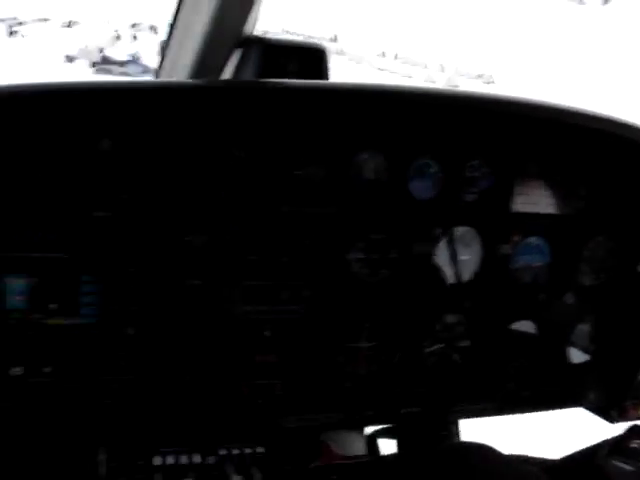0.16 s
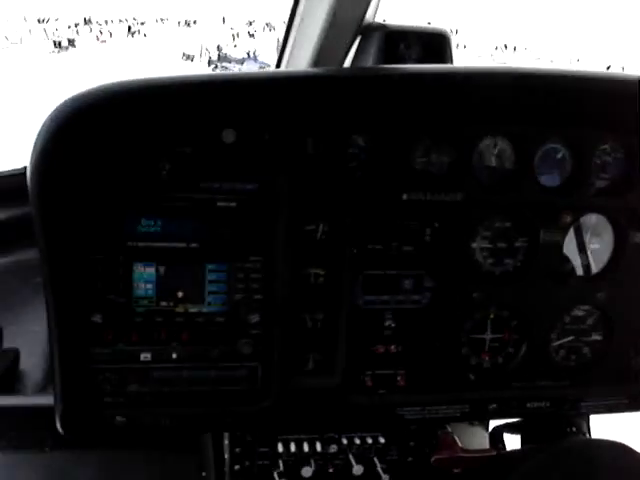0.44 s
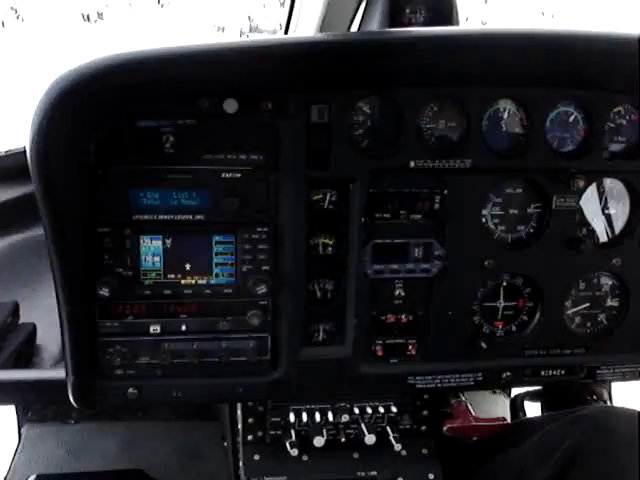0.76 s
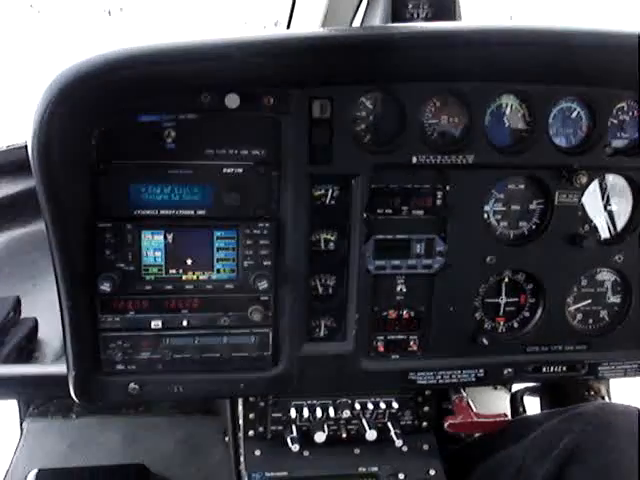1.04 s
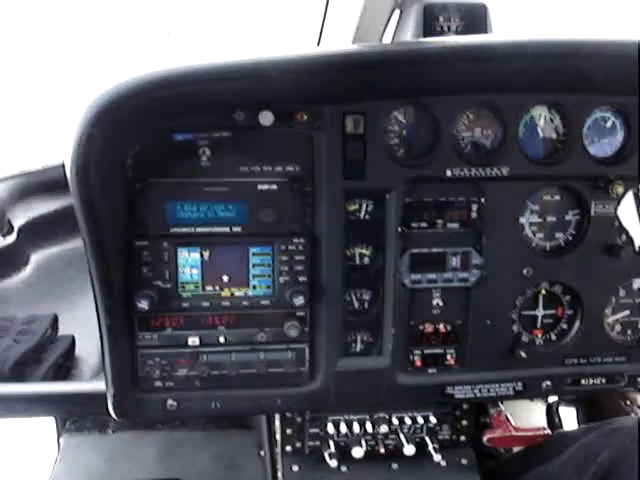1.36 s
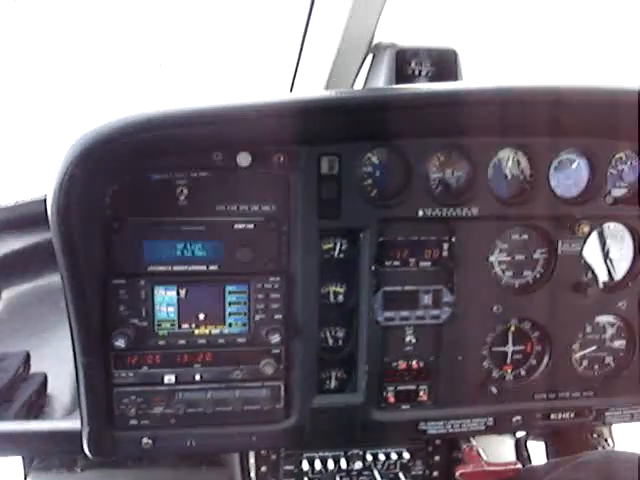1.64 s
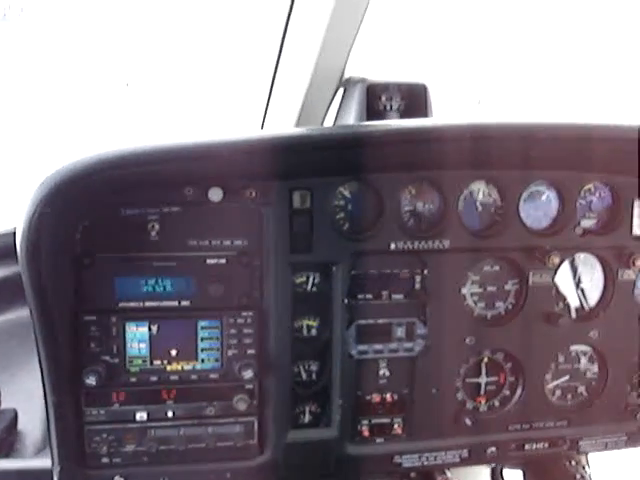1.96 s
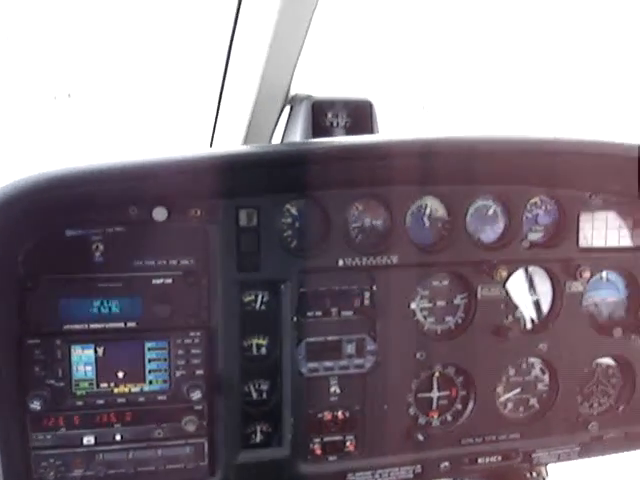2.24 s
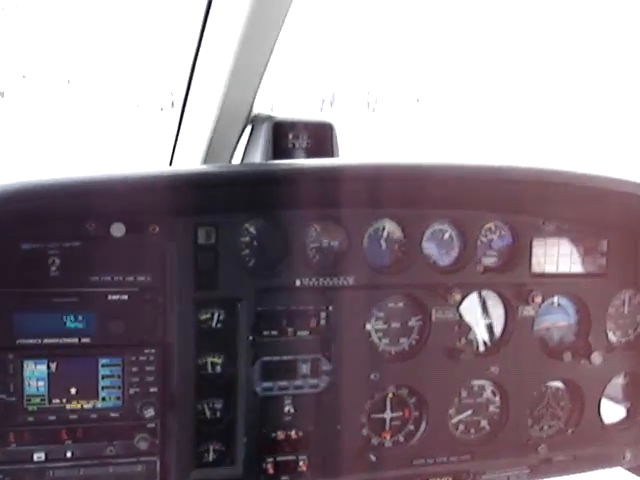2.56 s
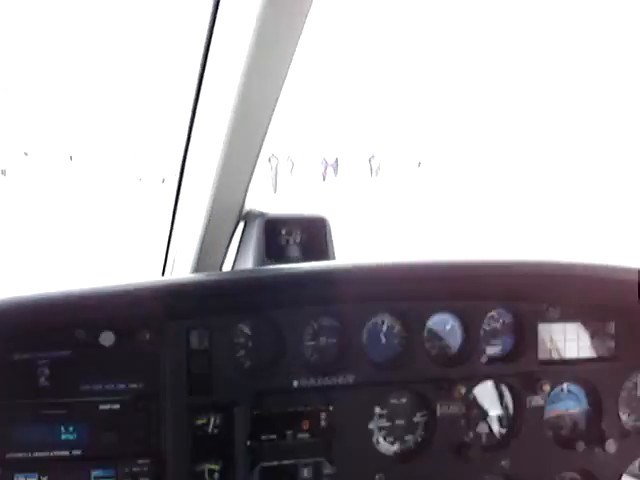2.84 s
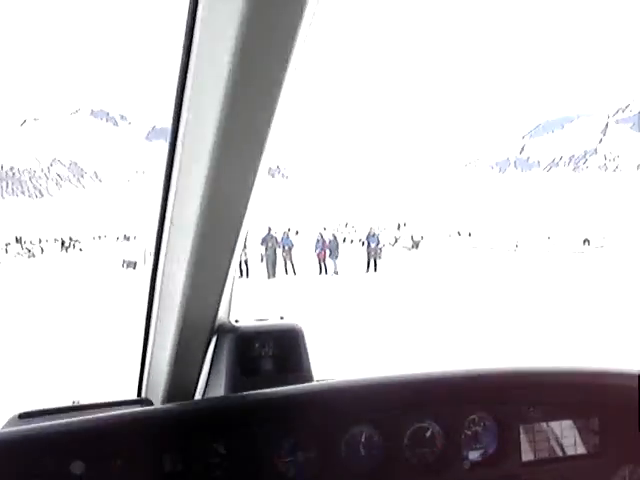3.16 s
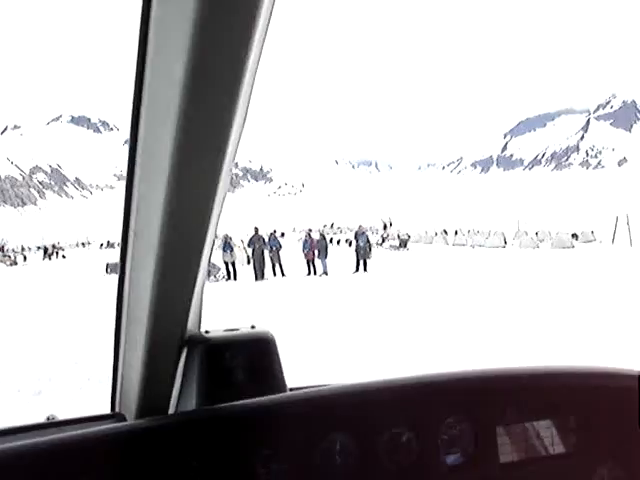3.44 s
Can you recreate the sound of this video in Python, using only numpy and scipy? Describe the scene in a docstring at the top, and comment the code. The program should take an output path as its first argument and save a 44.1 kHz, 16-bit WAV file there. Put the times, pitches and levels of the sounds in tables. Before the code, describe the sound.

Helicopter engine and rotor droning loudly and steadily, heard from inside the cockpit.

```python
"""Inside the cockpit of a turbine helicopter. From the start, air pushed by the rotor roars through the
cabin and swells with every passing blade. The main and tail rotors drone below it; gears and turbine whine
above it, swelling and fading as the microphone moves through the cabin. One shaft drives them all: around
2 s it has slowed a little, so every tone sags, and the tail rotor's overtones fade briefly. By about 3 s
the pitch is nearly back, and the two main gear tones grow louder toward the end."""
import sys
import numpy as np
from scipy.fft import rfft, irfft, next_fast_len
from scipy.io import wavfile
from scipy.ndimage import map_coordinates

SR = 44100
rng = np.random.default_rng(int(sys.argv[2]) if len(sys.argv) > 2 else 0)


def dump(signal):
    """Clip the signal to [-1, 1] and save it as 16-bit WAV at the path in sys.argv[1]."""
    limited = np.clip(np.atleast_2d(signal).T, -1, 1)
    pcm = np.round(limited * 32767).astype(np.int16)
    wavfile.write(sys.argv[1], SR, pcm)


N = 159201

# cycles of the high gear tone per main blade pass, per tail blade pass and per cycle of the low gear tone
MAIN_RATIO, TAIL_RATIO, LOW_GEAR_RATIO = 88.0, 24.92, 2.6424


def amp(db):
    """Turn decibels into a factor to multiply by."""
    return 10 ** (np.asarray(db) / 20)


def along(points, hz):
    """Join (f/Hz, value) points on a log frequency axis and read the values at hz."""
    freqs, values = np.transpose(points)
    return np.interp(np.log(hz + 1), np.log(freqs + 1), values)


def curves(rows):
    """Turn rows of (t/s, values...) into one curve per column, with a value for every sample."""
    times, *columns = np.transpose(rows)
    return [np.interp(np.arange(N) / SR, times, column) for column in columns]


def wobble(rate):
    """A smooth curve through random points, rate of them a second, mostly between -1 and 1."""
    points = rng.standard_normal(int(N * rate / SR) + 4)
    return map_coordinates(points, [np.arange(N) * rate / SR])


def tone(hz, db, flutter_hz, shimmer_db, rate):
    """A sine wave of rms level db whose pitch (flutter) and level (shimmer) tremble at random."""
    turns = np.cumsum(hz + flutter_hz * wobble(rate)) / SR + rng.random()
    return np.sqrt(2) * amp(db + shimmer_db * wobble(rate)) * np.sin(2 * np.pi * turns)


def blade_angle(gear_hz):
    """An angle in radians that goes once around per main blade; it is zero whenever a blade is overhead."""
    passes = np.cumsum(gear_hz / MAIN_RATIO) / SR
    return 2 * np.pi * (passes - .54)  # the first blade arrives after .54 of a cycle


def turbine(gear_hz):
    """The turbine and small gears whine faintly; each whine swells once as the microphone moves."""
    # whines: f/Hz at average shaft speed, level/dB, pitch flutter/Hz, t/s of the swell, its lift/dB
    whines = [(2570, -53.5, 14, 2.4, 1.5), (3091, -57.5, 1, 1.3, 2), (3235, -54, 7, 2.6, 6),
              (3893, -56, 1.5, 2.7, 7), (3938, -61, 1, .3, 3), (4545, -61, 3, .9, 3),
              (8812, -65, 2, 1.5, 8)]
    speed, t = gear_hz / gear_hz.mean(), np.arange(N) / SR
    swell_s = .55
    out = np.zeros(N)
    for hz, db, flutter_hz, peak_s, lift_db in whines:
        swell = np.exp(-((t - peak_s) / swell_s) ** 2)
        out += tone(hz * speed, db + lift_db * swell, flutter_hz, shimmer_db=2.1, rate=50)
    return out


def main_rotor(gear_hz):
    """The big blades pass about 20 times a second and make a deep, steady throb."""
    # tones of the throb: multiple of the blade rate, level/dB
    harmonics = [(1, -36), (2, -44), (3, -44.5), (4, -48), (5, -47), (6, -37.5)]
    blade_hz = gear_hz / MAIN_RATIO
    return sum(tone(k * blade_hz, db, flutter_hz=.15, shimmer_db=2.5, rate=3.7) for k, db in harmonics)


def tail_rotor(gear_hz):
    """The tail blades drone unevenly in the air stirred up by the main rotor."""
    # tones of the drone: multiple of the blade rate, level/dB
    harmonics = [(1, -37.5), (2, -30.5), (3, -33), (4, -34.5), (5, -45), (6, -39.5)]
    # rise and fall of all but the lowest tone: t/s, level change/dB
    overtone_levels = [(0, 0.5), (.7, -1), (1.55, 1.5), (1.8, -4.5), (2.1, -9), (2.3, 0.5), (3.6, 0)]
    overtone_db, = curves(overtone_levels)
    blade_hz = gear_hz / TAIL_RATIO
    return sum(tone(k * blade_hz, db + (k > 1) * overtone_db, flutter_hz=.301 * k, shimmer_db=1.5, rate=7)
               for k, db in harmonics)


def gearbox(gear_hz):
    """Two pairs of gears whine as their teeth meet; cabin echoes give each tone loud and quiet spots."""
    # gear tones at the microphone: t/s, then level/dB for each of the five partials below
    gear_levels = [(0,-31.5,-44,-30.5,-45.5,-60), (0.25,-32,-31.5,-27.5,-43.5,-50),
                   (0.6,-33.5,-32,-31,-49,-56), (0.95,-32,-32,-30.5,-41.5,-48.5),
                   (1.4,-35.5,-30.5,-31.5,-43.5,-51), (1.7,-35.5,-29.5,-36,-46,-57),
                   (1.95,-30,-32.5,-46,-37.5,-59), (2.15,-30,-30.5,-33.5,-42.5,-57),
                   (2.5,-29,-33,-34.5,-34.5,-45.5), (2.72,-30,-32,-37,-41,-49),
                   (2.925,-29.5,-38.5,-27.5,-39,-42.5), (2.945,-32.5,-43,-31.5,-40,-55),
                   (3.12,-27.5,-45,-27,-41.5,-60), (3.6,-26.5,-39.5,-24.5,-43.5,-55)]
    low_hz = gear_hz / LOW_GEAR_RATIO
    partials = [(low_hz, 1), (low_hz, 2), (gear_hz, 1), (gear_hz, 2), (gear_hz, 3)]  # f/Hz, multiple
    throb_db = .94 * np.cos(blade_angle(gear_hz))  # each blade puts a load on the gears
    return sum(tone(k * hz, db + throb_db, flutter_hz=1.26 * k, shimmer_db=1.5, rate=45)
               for (hz, k), db in zip(partials, curves(gear_levels)))


def cabin_lift_db(hz):
    """The air in the cabin rings at certain pitches and boosts the noise near them."""
    # resonances: f/Hz, width/Hz, lift/dB
    resonances = [(167, 16, 3), (232, 22, 3), (287, 44, 3.5), (343.5, 27, 4.5), (420, 6.4, 1.5),
                  (455, 15, 2), (540, 15, 5), (1042, 33, 3.5)]
    return sum(db / (1 + (2 * (hz - centre) / width) ** 2) for centre, width, db in resonances)


def roar(gear_hz):
    """Air pushed by the rotor, mixed with engine noise, churns and swells as each blade passes overhead."""
    # tone colour of the noise: f/Hz, relative level/dB
    colour = [(15, -29), (48, -21), (80, -16.5), (105, -5), (150, -4), (188, -5.5), (220, -2), (345, -2.5),
              (450, -5), (620, -11), (800, -12), (930, -15.5), (1180, -15), (1400, -19.5), (1650, -19),
              (2100, -26), (3300, -26.5), (4100, -31.5), (5300, -31), (7500, -34.5), (9800, -34)]
    # five bands of the roar: centre f/Hz, then depth/dB for the blade swell, own flutter and churning
    bands = [(110, .4, .4, .3), (330, 1.5, .4, 1.0), (1000, 2.6, .3, 1.4), (2700, 1.8, .3, .6),
             (4300, .25, .45, .35)]
    # the three middle bands: t/s, low-mid level/dB, mid level/dB, upper-mid level/dB
    mid_levels = [(0, 4, 7.5, 1.1), (0.1, -3.2, 1.0, 0.4), (0.27, 1.9, 2.2, 1.2), (0.4, -2.2, 0.5, -2),
                  (0.56, 4, 0.8, -1.5), (0.7, -0.2, 2, -0.8), (0.95, 1.5, 0.2, 0.7), (1.08, -1, -0.3, -0.5),
                  (1.33, 2.5, 3, 2.1), (1.5, -0.2, 0.3, 1.7), (1.65, 1.4, 0.8, 1.7),
                  (1.83, -1.2, 1.5, -0.5), (1.96, 3, -1.0, 0.8), (2.15, -0.8, 0.0, 0.5),
                  (2.91, -0.7, 0.5, 0), (2.96, -0.3, -2.5, 0), (3.1, -1.5, -1.5, -0.8),
                  (3.6, 0.4, -0.3, -0.2)]
    # the top band, a hiss: t/s, level/dB
    hiss_levels = [(0, -0.2), (.27, 0.3), (.6, -2.5), (1.35, 0), (2.0, -1.6), (2.925, -0.3), (2.945, -4),
                   (3.08, -1.2), (3.6, -1)]
    # how hard the blades beat: t/s, factor
    beat_strength = [(0, 1.7), (.4, 0.84), (.7, 0.62), (1.3, 0.76), (1.75, 1.1), (2.3, 1.45), (2.6, .65),
                     (3.1, 0.46), (3.5, 1.1)]

    angle = blade_angle(gear_hz)
    beat, = curves(beat_strength)
    flat_topped_wave = np.cos(angle) - .35 * np.cos(2 * angle)
    swell = flat_topped_wave * (beat + .42 * wobble(rate=20))  # no two blades beat quite alike
    churn = wobble(rate=110)  # swirling air shakes all bands together

    size = next_fast_len(N + 8192)
    hz = np.fft.rfftfreq(size, 1 / SR)
    spectrum = rfft(rng.standard_normal(size)) * amp(along(colour, hz) + cabin_lift_db(hz))
    spectrum /= irfft(spectrum, size).std()

    centres = [band[0] for band in bands]
    levels = [0, *curves(mid_levels), *curves(hiss_levels)]  # the lowest band has no level curve
    out = np.zeros(N)
    for pick, level_db, (_, swell_db, flutter_db, churn_db) in zip(np.eye(len(bands)), levels, bands):
        band_filter = along(list(zip(centres, pick)), hz)  # 1 at this band's centre, 0 at the others
        band = irfft(spectrum * band_filter, size)[:N]
        out += band * amp(level_db + swell_db * swell + flutter_db * wobble(rate=14) + churn_db * churn)
    return amp(-19) * out


def scene():
    """Add up all the sources in one channel; one shaft speed drives them all."""
    # shaft speed, given as the pitch of the high gear tone: t/s, f/Hz
    shaft_speed = [(0, 1725), (0.6, 1719), (1.3, 1716), (2.05, 1704), (2.5, 1705), (3.1, 1717.9),
                   (3.6, 1718)]
    gear_hz, = curves(shaft_speed)
    mix = roar(gear_hz) + main_rotor(gear_hz) + tail_rotor(gear_hz) + gearbox(gear_hz) + turbine(gear_hz)
    return mix[None]


def record(dry):
    """Cut away the treble above about 10 kHz."""
    top_hz, fade_width_hz = 10080, 250
    size = next_fast_len(N + SR // 2)
    hz = np.fft.rfftfreq(size, 1 / SR)
    low_pass = np.clip((top_hz - hz) / fade_width_hz + .5, 0, 1)
    return irfft(rfft(dry, size) * low_pass, size)[..., :N]


dry = scene()
out = record(dry)
dump(out)
```